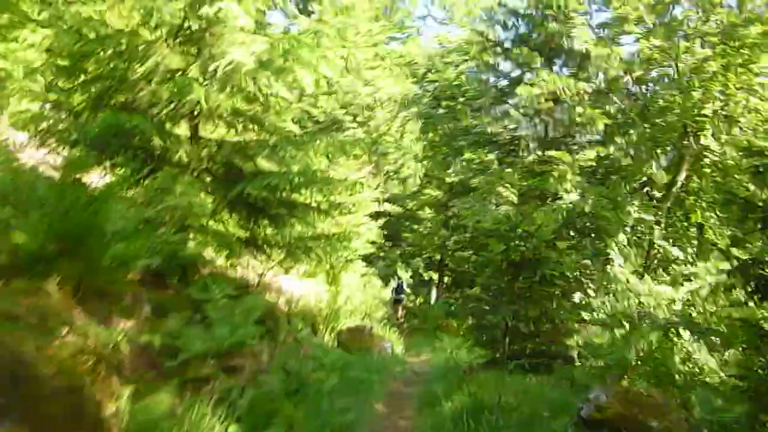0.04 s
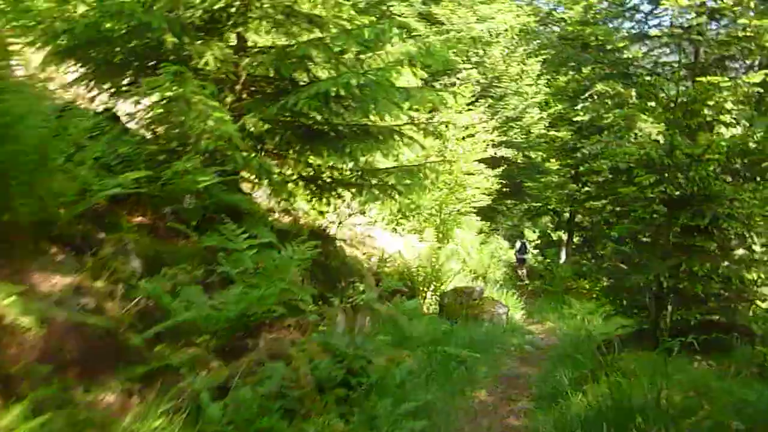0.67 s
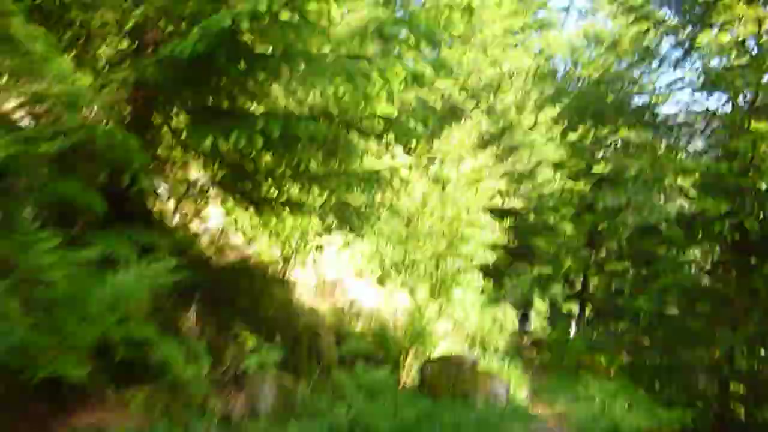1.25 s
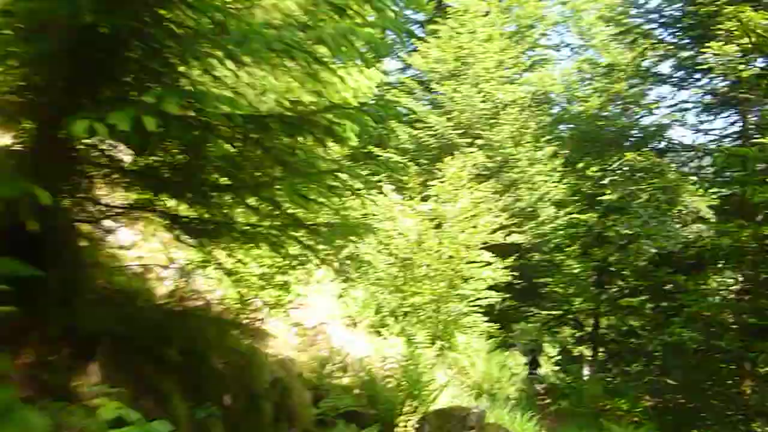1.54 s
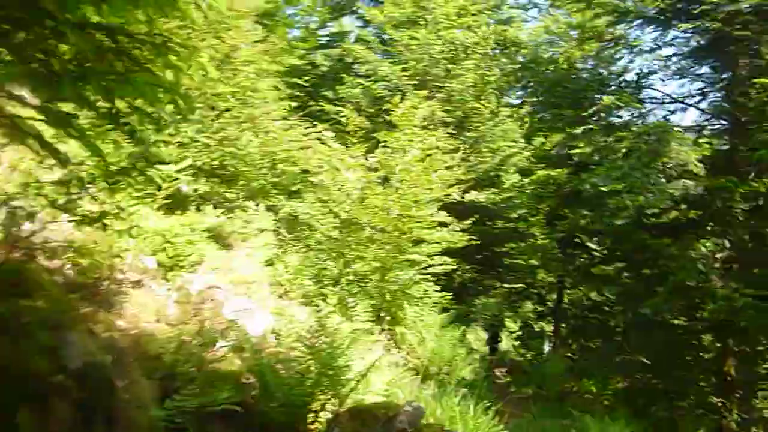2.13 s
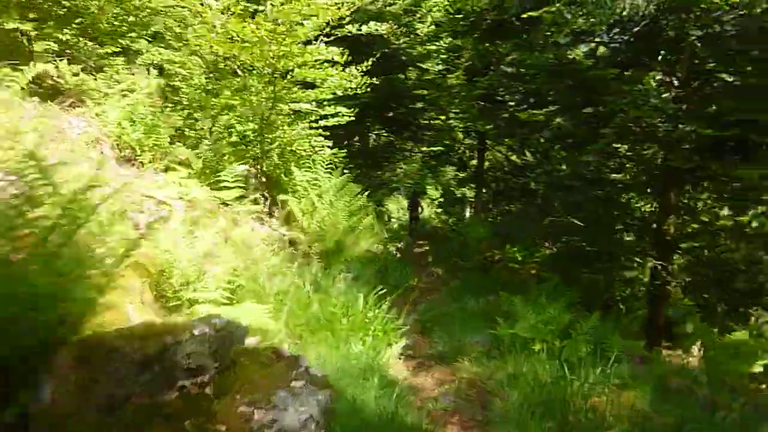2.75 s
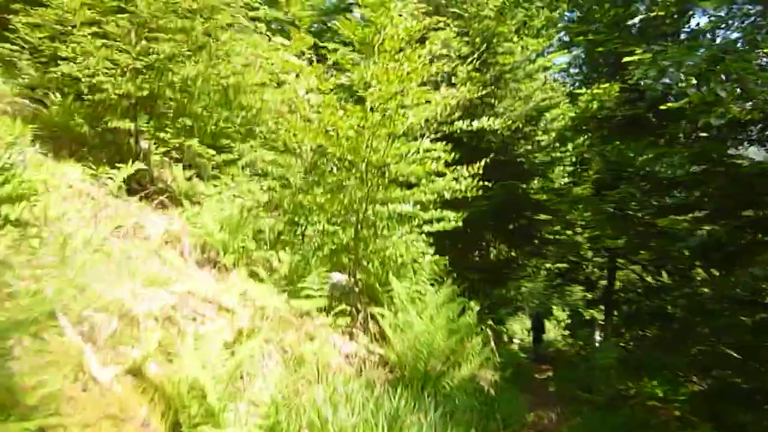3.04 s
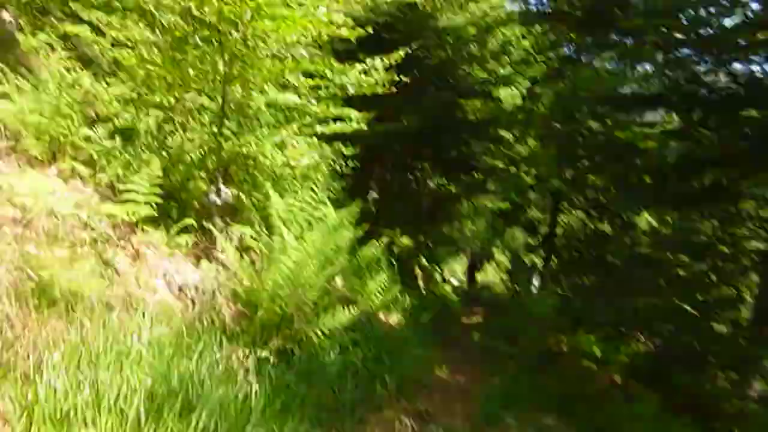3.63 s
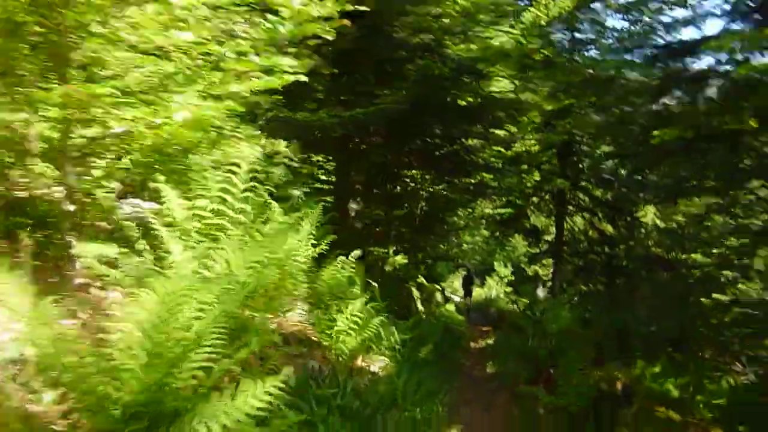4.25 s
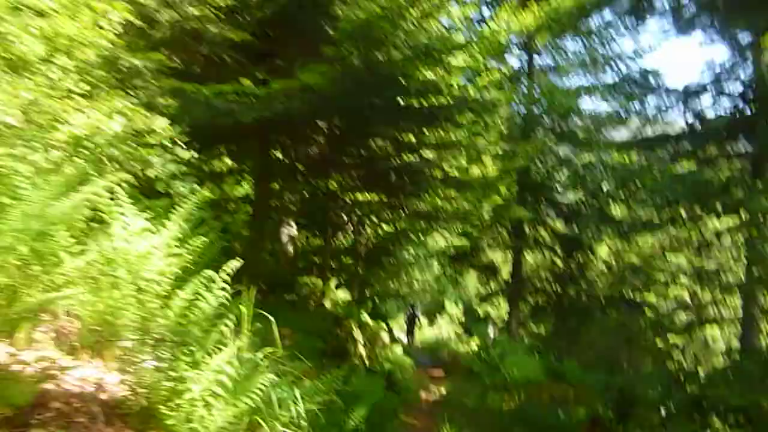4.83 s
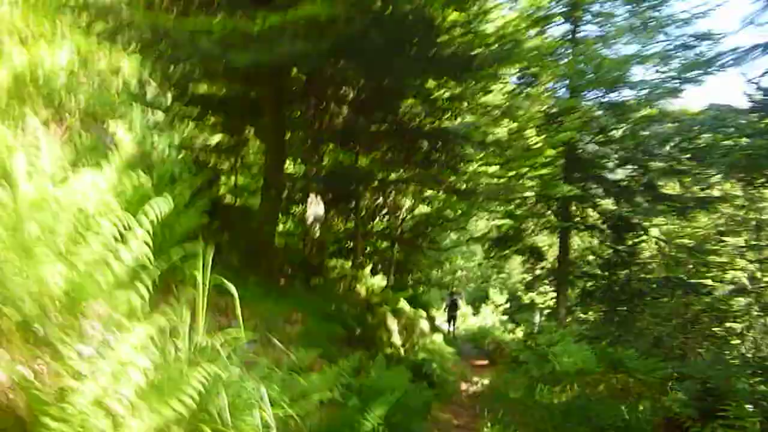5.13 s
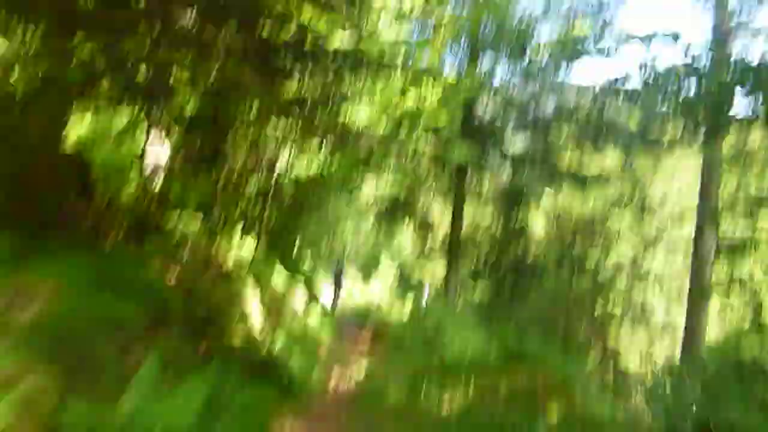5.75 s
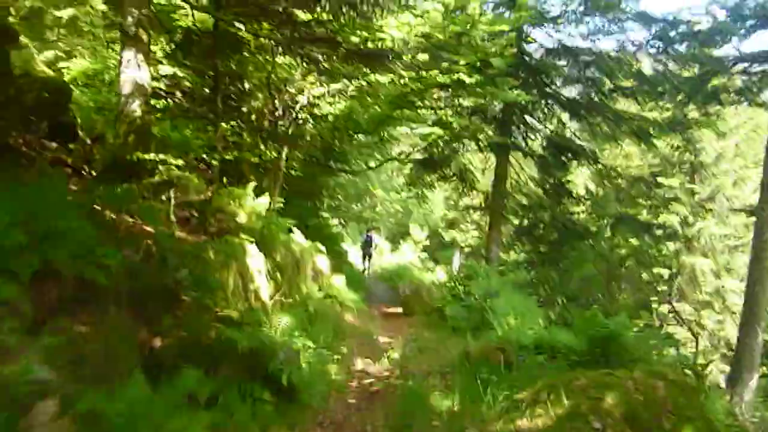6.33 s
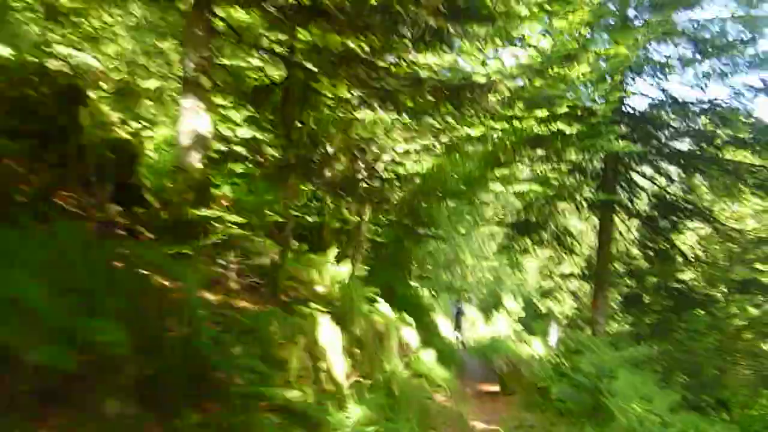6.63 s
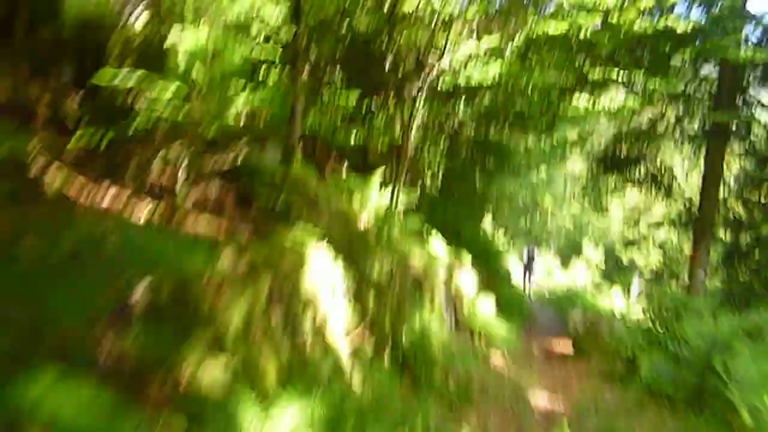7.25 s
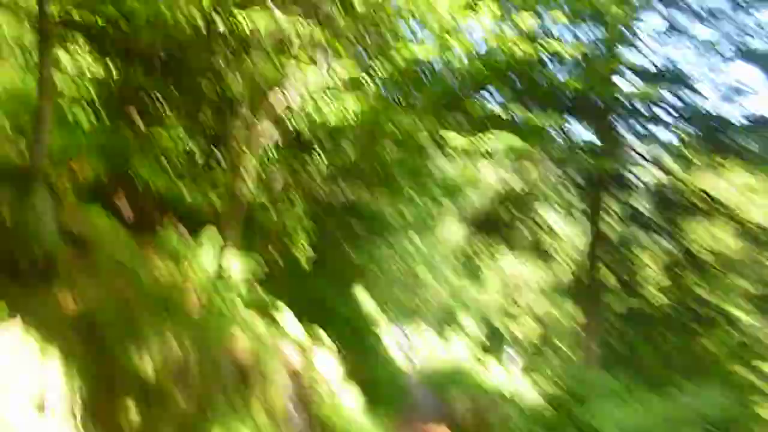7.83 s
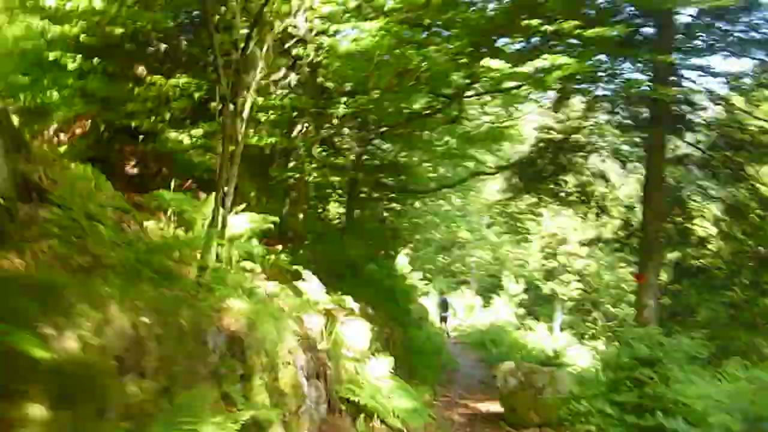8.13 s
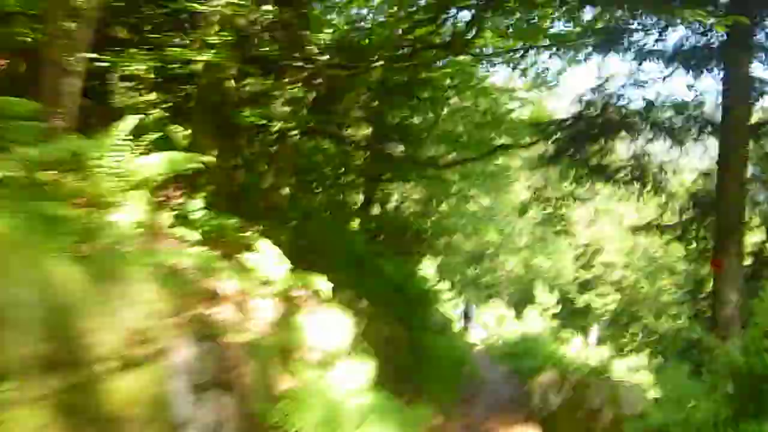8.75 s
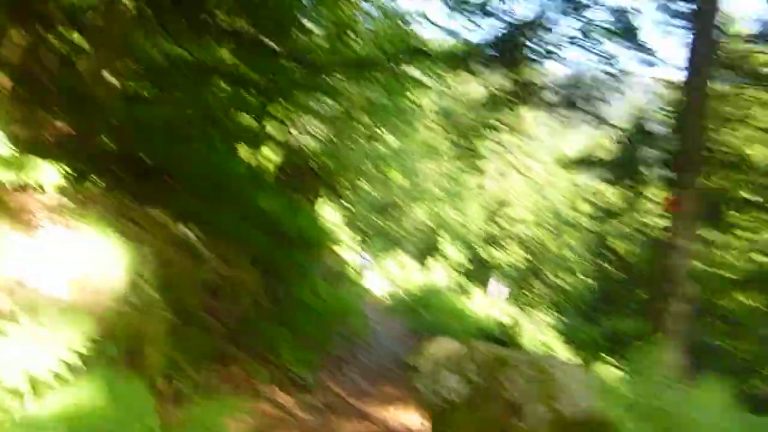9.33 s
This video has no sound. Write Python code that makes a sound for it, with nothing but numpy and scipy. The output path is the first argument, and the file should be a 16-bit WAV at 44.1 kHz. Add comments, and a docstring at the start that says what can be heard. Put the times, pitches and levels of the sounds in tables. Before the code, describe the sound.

Quick, steady running on a forest path is heard through the jolting of a handheld camera. Clusters of short knocks, small rattles and dull thumps repeat from start to finish, about three strides a second. Each arm swing brings a low puff of wind on the microphone, a flutter and a light rustle. Occasional faint ticks and brushes come mostly in the second half. The sound is close, without echo, above a faint hiss.

```python
"""On a dirt forest trail, a runner takes about three strides a second with a small camera in the hand.
Every footfall jolts the camera: loose gear knocks and rattles, exciting damped modes of the housing
and of a small part, and dull thumps come through the grip. With each stride air rumbles over the
microphone, the grip flutters and a soft rustle swells. A few ticks and brushing sounds join in,
all above the recorder's hiss."""
import sys
import numpy as np
from scipy import signal
from scipy.fft import rfft, irfft, next_fast_len
from scipy.io import wavfile
from scipy.ndimage import uniform_filter1d

SR = 44100
rng = np.random.default_rng(int(sys.argv[2]) if len(sys.argv) > 2 else 0)


def persist_wave(psi):
    """Save psi, clipped to +-1, as 16-bit WAV."""
    counts = np.round(np.clip(psi, -1, 1) * 32767).astype(np.int16)
    wavfile.write(sys.argv[1], SR, np.atleast_2d(counts).T)


N = 413646

# strides, at the fastest swing of the arm: time_s, buffet_db, flutter_db, rustle_db
STRIDES = [(0.22, -33.5, -43.5, -48.5), (0.56, -31, -48, -49), (0.89, -40.5, -53, -53.5),
           (1.23, -33.5, -47, -49.5), (1.56, -36.5, -47.5, -51), (1.91, -33, -43.5, -47),
           (2.27, -31, -47, -47.5), (2.621, -34.5, -44, -48.5), (2.99, -30, -44.5, -48),
           (3.32, -32, -41, -49), (3.72, -34.5, -41, -49), (4.0, -31, -43, -51.5),
           (4.438, -32.5, -40.5, -44.5), (4.791, -36.5, -41.5, -48.5), (5.17, -31.5, -49, -54),
           (5.541, -34, -43.5, -50), (5.81, -34.5, -44.5, -50), (6.2, -33, -44, -52),
           (6.55, -35, -42.5, -50), (6.89, -31.0, -42, -50.5), (7.238, -28.5, -43.5, -46),
           (7.56, -35, -47, -48.5), (7.94, -30.5, -39.5, -45), (8.32, -30.0, -44, -49.5),
           (8.7, -32, -39.5, -49), (9.09, -31.5, -45, -51.5), (9.4, -39.5, -47, -50.5)]
# modes of a small loose part: frequency_hz, level_db, t60_s
SMALL_PART_MODES = [(754, 11, 0.0069), (1062, 7, 0.01), (1420, 0, 0.0032), (2167, -5, 0.0073),
                    (2530, -9.5, 0.0064), (2900, -8.5, 0.0069), (3445, -26, 0.0084)]


def gain_of(db):
    """Amplitude ratio: a factor of ten for every 20 dB."""
    return 10 ** (np.asarray(db) / 20)


def unit_rms(x):
    """Normalisation to a mean power of one."""
    return x / np.sqrt(np.mean(x ** 2) + 1e-20)


def spectrum_gain(points, hz):
    """Frequency response: (frequency_hz, level_db) points interpolated on a log-frequency axis."""
    point_hz, db = np.transpose(points)
    return gain_of(np.interp(np.log(hz + 1), np.log(point_hz + 1), db))


def add(mix, start_s, sound):
    """Superposition: a sound sums into the mix from start_s on."""
    part = mix[max(round(start_s * SR), 0):][:len(sound)]
    part += sound[:len(part)]


def noise(spectrum):
    """Spectral shaping: white noise filtered to the given spectrum, at rms 1."""
    size = next_fast_len(N)
    colour = spectrum_gain(spectrum, np.fft.rfftfreq(size, 1 / SR))
    return unit_rms(irfft(rfft(rng.standard_normal(size)) * colour, size)[:N])


def wander(hz):
    """Random modulation: smoothed noise of rms 1, changing about hz times a second."""
    size = int(SR / hz)
    return unit_rms(uniform_filter1d(uniform_filter1d(rng.standard_normal(N), size), size))


def swell(peak_db, rise_db_per_s, fall_db_per_s, rest_db):
    """Exponential growth and decay around each stride, added in power to a resting level."""
    t = np.arange(0, N, 64) / SR
    since_s = t - np.array(STRIDES)[:, :1]
    db = peak_db[:, None] - np.maximum(-since_s * rise_db_per_s, since_s * fall_db_per_s)
    return np.interp(np.arange(N) / SR, t, np.hypot(gain_of(db.max(0)), gain_of(rest_db)))


def stride_noise(buffet_db=3.0, flutter_db=1.3, rustle_db=2.2, lumpy_db=5.0, grain_db=3.5, patch_db=2.5):
    """Amplitude-modulated noise: air buffeting, grip flutter and rustle swell with each stride."""
    # spectra of the three layers: frequency_hz, density_db
    buffet_spectrum = [(8, -3.5), (22, -3), (48, 0.5), (75, -2.5), (110, -6), (170, -15), (300, -39),
                       (600, -84.5)]
    flutter_spectrum = [(50, -16.5), (110, -2.5), (170, 1), (250, -4.5), (350, -9), (440, -13),
                        (560, -20.5), (1000, -44.5), (2000, -70)]
    rustle_spectrum = [(250, -11), (380, -12.5), (440, 0.5), (520, -7), (700, -5), (790, 2), (920, 0),
                       (1180, 1), (1400, -6.5), (1700, -13.5), (2300, -22), (3000, -28), (4000, -37),
                       (8000, -59.5)]
    # their envelopes: rise_db_per_s, fall_db_per_s, rest_db
    buffet_shape = dict(rise_db_per_s=145, fall_db_per_s=148.5, rest_db=-47.5)
    flutter_shape = dict(rise_db_per_s=33.5, fall_db_per_s=47, rest_db=-52.5)
    rustle_shape = dict(rise_db_per_s=23.5, fall_db_per_s=54, rest_db=-58.5)
    _, buffet_peaks, flutter_peaks, rustle_peaks = np.transpose(STRIDES)
    swing = swell(buffet_peaks, **buffet_shape)
    eddies = noise(buffet_spectrum)
    eddies /= np.sqrt(uniform_filter1d(eddies ** 2, size=3500) + 0.057)  # evened: the swing sets the level
    buffet = gain_of(buffet_db) * swing * eddies
    lumps = gain_of(lumpy_db * np.minimum(wander(74), 1.6))
    shake = unit_rms(swing ** 0.23) * lumps  # the grip flutters most in mid-swing
    tremor = unit_rms(noise(flutter_spectrum) * shake)
    flutter = gain_of(flutter_db) * swell(flutter_peaks, **flutter_shape) * tremor
    grains = unit_rms(noise(rustle_spectrum) * gain_of(grain_db * wander(160) + patch_db * wander(22)))
    rustle = gain_of(rustle_db) * swell(rustle_peaks, **rustle_shape) * grains
    return buffet + flutter + rustle


def struck(modes, chatter_s, bounce, grit, push=0, spot_db=2.23, size=3000):
    """Modal response: a force of contact, bounces and scraping is convolved with damped modes."""
    t = np.arange(size) / SR
    hz, mode_db, t60_s = np.transpose(modes)[:, :, None]
    spot, detune, side = rng.standard_normal((3, len(modes), 1))  # each blow lands on a different spot
    swings = np.sin(2 * np.pi * hz * (1 + .008 * detune) * t) * np.sign(side + .4)
    ring = (gain_of(mode_db + spot_db * spot - 60 * t / t60_s) * swings).sum(0)
    ring += push * np.sin(2 * np.pi * 620 * t) * np.exp(-t / 0.00088)  # the blow itself, a dead knock
    scrape_decay = np.exp(-t / chatter_s) + 0.2 * np.exp(-t / 0.018)
    force = grit * rng.standard_normal(size) * scrape_decay
    force[0] += 1  # first contact
    bounce_s = rng.random(5) * 1.5 * chatter_s
    force[np.minimum((bounce_s * SR).astype(int), size - 1)] += bounce * rng.standard_normal(5)
    return signal.fftconvolve(force, ring)[:size]


def rattles(gain_db=-1, chatter_s=.003, stirred_db=-5.0, spread_s=.13):
    """Repeated impact: a small loose part buzzes briefly, and every stride also stirs it faintly."""
    # the clearer rattles: start_s, level_db
    clear = [(0.015, -33), (0.085, -35), (0.104, -37.5), (0.476, -37), (0.646, -39.5), (1.155, -37.5),
             (1.273, -35), (1.324, -36.5), (1.595, -32), (2.318, -37.0), (2.648, -37), (2.757, -42.0),
             (3.001, -32), (3.405, -38), (3.681, -35), (3.754, -32), (3.872, -37), (4.0, -34.5),
             (4.342, -40.5), (4.843, -32), (5.426, -42), (5.581, -36), (5.764, -37), (5.885, -34),
             (5.917, -39), (6.034, -39.0), (6.079, -37.5), (6.172, -42), (6.199, -34.5), (6.306, -36.5),
             (6.368, -39.5), (6.394, -38.5), (6.556, -31.5), (6.852, -35.5), (6.87, -40.0), (7.114, -31.5),
             (7.211, -32), (7.244, -40.0), (7.264, -34.5), (7.529, -39), (7.646, -34.0), (7.766, -40.5),
             (7.93, -32), (7.975, -36), (8.365, -36), (8.395, -34), (8.474, -42), (8.512, -42),
             (8.574, -34), (9.194, -42), (9.363, -39)]
    stirred = [(stride_s + spread_s * rng.uniform(-1, 1), flutter_db + stirred_db)
               for stride_s, _, flutter_db, _ in STRIDES]
    out = np.zeros(N)
    for start_s, db in np.r_[clear, stirred]:
        buzz = struck(SMALL_PART_MODES, chatter_s, bounce=0.57, grit=0.15)
        add(out, start_s, gain_of(db + gain_db) * buzz / np.std(buzz[:SR // 100]))
    return signal.sosfilt(signal.butter(6, 3350, fs=SR, output="sos"), out)


def thumps(gain_db=1.2, rise_cycles=0.4, fall_cycles=0.81, slack=0.64, snap=0.11, size=1200):
    """Heavily damped oscillation: a shove of the grip swings once or twice, quickest at its peak."""
    # shoves through the grip: peak_s, level_db, nominal_pitch_hz
    shoves = [(0.044, -25.5, 154), (0.081, -21.5, 188), (0.136, -18.5, 154), (0.324, -24, 210),
              (0.387, -25.5, 284), (0.552, -16, 199), (0.581, -12, 261), (0.893, -26.5, 195),
              (1.029, -16, 187), (1.548, -23.5, 163), (1.867, -21.5, 230), (1.896, -23.5, 267),
              (1.947, -19, 179), (2.058, -20, 196), (2.225, -23, 192), (2.279, -16, 185),
              (2.748, -16.5, 158), (2.801, -22, 199), (2.936, -24, 165), (3.002, -22.5, 243),
              (3.179, -19, 187), (3.28, -12.5, 211), (3.356, -24.5, 155), (3.585, -22.5, 215),
              (3.721, -21, 149), (3.976, -21, 257), (4.057, -19, 283), (4.138, -16.0, 201),
              (4.244, -22, 311), (4.313, -17, 276), (4.346, -23, 163), (4.424, -16.5, 255),
              (4.439, -18.5, 194), (4.467, -22, 207), (4.653, -15.5, 187), (4.769, -12.0, 200),
              (4.851, -22.5, 169), (5.236, -28.5, 202), (5.495, -22, 187), (5.812, -14, 188),
              (5.944, -26.5, 272), (6.251, -29.5, 340), (6.303, -25.5, 162), (6.667, -21, 210),
              (6.714, -23.5, 179), (7.132, -16.5, 168), (7.254, -14.5, 176), (7.358, -25.5, 211),
              (7.556, -18.5, 190), (7.875, -23, 218), (7.929, -11, 193), (8.268, -22.5, 293),
              (8.351, -19.5, 230), (8.423, -25, 252), (8.646, -20, 177), (8.702, -14.5, 184),
              (8.744, -22, 257), (9.063, -11.0, 185)]
    out, t = np.zeros(N), np.arange(-size, size) / SR
    for (peak_s, db, hz), phase in zip(shoves, rng.random(len(shoves))):
        cycles = t * hz
        envelope = 1 / np.cosh(2 * cycles / np.where(t < 0, rise_cycles, fall_cycles))
        turns = slack * cycles + snap * np.tanh(4 * cycles) + phase
        add(out, peak_s + t[0], gain_of(db + gain_db) * envelope * np.sin(2 * np.pi * turns))
    return out


def weigh_bands(sound, band_db, span_s=.016, size=4096):
    """Minimum-phase filtering: four bands near band_db (energy over span_s), with no pre-ringing."""
    edges_hz = [200, 550, 1400, 3800, 8000]
    plateaus_hz = [(200, 470), (640, 1150), (1650, 3600), (3950, 8000)]
    hz, spectrum = np.fft.rfftfreq(size, 1 / SR), rfft(sound, size)
    energy = np.add.reduceat(abs(spectrum) ** 2, np.searchsorted(hz, edges_hz))[:-1] * 2 / size
    lift_db = band_db - 10 * np.log10(energy / (span_s * SR) + 1e-20)
    log_gain = np.log(spectrum_gain(np.c_[np.ravel(plateaus_hz), np.repeat(lift_db, 2)], hz))
    causal = np.exp(np.conj(signal.hilbert(np.r_[log_gain, log_gain[-2:0:-1]])))
    return irfft(spectrum * causal[:len(spectrum)], size)


def dispersed(x, hz=1500, width_hz=1800):
    """Dispersion: bending waves cross the housing at unequal speeds; an all-pass smears each blow."""
    radius = np.exp(-np.pi * width_hz / SR)
    poles = np.array([1, -2 * radius * np.cos(2 * np.pi * hz / SR), radius ** 2])
    return signal.lfilter(poles[::-1], poles, x)


def knocks(weight_trim_db=-1, click_db=-22, hard_blow_db=-28, graze_db=-22, graze_s=0.0016):
    """Impact excitation: loose gear strikes the housing, and harder blows excite more treble."""
    # blows: start_s, level_db (550-1400 Hz), weight_db (band below), crack_db (band above), chatter_s
    # weight and crack are relative to the level
    blows = [(0.186, -26.5, -8, -13.5, 0.0027), (0.197, -34, -8, -10, 0.0026),
             (0.236, -37, 9.8, -19.8, 0.005), (0.289, -33.5, 0.5, -19, 0.0024),
             (0.459, -34, 6.5, -21, 0.0038), (0.493, -28, -5, -11, 0.0035),
             (0.502, -33.5, 2.5, -14, 0.0056), (0.546, -37.5, 5, -19.3, 0.0056),
             (0.565, -30, 3, -14.5, 0.0055), (0.618, -27, -0.5, -11.5, 0.00099),
             (0.792, -35.5, 4.5, -18, 0.0018), (0.866, -29.5, 0, -12.5, 0.0023),
             (1.083, -35.0, 5, -18, 0.004), (1.124, -27.5, -12, -12, 0.0018),
             (1.188, -29.5, 0.5, -12, 0.002), (1.217, -33.0, -13, -16.5, 0.0026),
             (1.53, -32.5, -9.5, -11, 0.0036), (1.555, -35.5, -4.7, -8, 0.0038),
             (1.757, -32.5, 7.5, -17, 0.0038), (1.819, -26.5, -8, -12.5, 0.0017),
             (1.92, -34.5, 4, -18, 0.0035), (1.993, -32.5, -9.5, -13.5, 0.0026),
             (2.167, -32, 7, -18.5, 0.0041), (2.241, -25.5, -6, -14.5, 0.0026),
             (2.472, -32, 5, -17, 0.0038), (2.521, -25.5, -2, -13, 0.0021),
             (2.569, -36, 4.8, -11.5, 0.0026), (2.626, -34.0, 1.5, -19, 0.0046),
             (2.847, -29.5, 5, -16.5, 0.0045), (2.966, -27.5, -4, -14.5, 0.0043),
             (2.98, -29, -4, -11, 0.0042), (3.181, -26.5, -3, -19, 0.0041),
             (3.255, -25.5, -4.5, -13.3, 0.0028), (3.364, -37.5, 6.8, -24, 0.0044),
             (3.437, -35, -15, -11.5, 0.0021), (3.602, -32.5, 6.5, -15.5, 0.0041),
             (3.698, -31, -10.2, -15, 0.0057), (3.709, -26.5, -12.5, -14, 0.0059),
             (3.729, -35, -5.2, -8.5, 0.0032), (3.934, -35, 7, -15.3, 0.0043),
             (3.978, -27, -1.5, -12, 0.0044), (4.057, -35, 5, -16, 0.0028), (4.263, -34, 0, -10, 0.0045),
             (4.302, -31.5, 8, -14, 0.0043), (4.394, -31.5, 2, -9.5, 0.0018),
             (4.469, -33.5, 4.3, -13.5, 0.004), (4.635, -35, 7.5, -14.8, 0.0033),
             (4.683, -25.5, -3.2, -13.5, 0.0035), (4.768, -31, 7, -16.3, 0.0055),
             (4.778, -35, 6.5, -15, 0.0025), (4.818, -26, -1.5, -9, 0.001),
             (5.024, -35.5, 5, -18.3, 0.0031), (5.077, -28.5, 0, -13, 0.0026),
             (5.138, -35, -11, -12.5, 0.0047), (5.347, -30, -5, -12, 0.002),
             (5.387, -26.5, -1.5, -20.5, 0.0034), (5.493, -38.5, 4, -12, 0.0025),
             (5.753, -36, 8.5, -12, 0.0052), (5.865, -23.5, -6, -14, 0.002),
             (6.094, -34.5, 2, -15.5, 0.0032), (6.186, -36.5, 5.5, -15, 0.0056),
             (6.282, -38, 6.5, -16, 0.0031), (6.454, -38.5, 7, -16.5, 0.0039),
             (6.531, -31, -7.5, -11.8, 0.0056), (6.54, -26.5, -5.2, -10, 0.0015),
             (6.566, -30.5, 2, -12, 0.0027), (6.589, -33.5, -14, -10.5, 0.0034),
             (6.749, -34, 4.5, -19.3, 0.0059), (6.797, -27.5, -2.2, -14.5, 0.0025),
             (6.839, -34.5, 2, -20.5, 0.0056), (6.902, -34.5, 8, -18.5, 0.004),
             (7.148, -32.5, 7, -17.5, 0.0039), (7.183, -25, -4.5, -9, 0.002),
             (7.221, -33.0, -15.2, -12.3, 0.0042), (7.435, -25.5, -3, -18.5, 0.0023),
             (7.472, -25.5, -6.5, -13.8, 0.0018), (7.568, -36.5, 5, -16, 0.0032),
             (7.604, -33, -15.7, -12.5, 0.0029), (7.798, -33, 6, -17, 0.0033),
             (7.881, -34, -3, -21, 0.0029), (7.902, -30, -1, -9, 0.0037), (7.923, -30, -1, -14, 0.0064),
             (8.131, -31, 6.5, -18, 0.004), (8.262, -23, -8.5, -13.5, 0.0018), (8.299, -32, -4, -14, 0.003),
             (8.326, -32, -7, -11.5, 0.0013), (8.341, -36.5, 6, -16, 0.0023),
             (8.378, -28.5, -4.5, -12.5, 0.0014), (8.558, -37.5, 7.5, -13, 0.00336),
             (8.692, -28, -5.5, -12.5, 0.0024), (8.736, -32.5, -5.5, -13, 0.0028),
             (8.89, -37.5, 6.5, -16.5, 0.0034), (9.011, -25.5, -6.2, -10.5, 0.0015),
             (9.09, -34, 1, -16.5, 0.0059), (9.103, -34, 5.5, -17, 0.0026),
             (9.139, -26.5, -1, -9.5, 0.0015), (9.232, -34, -2, -11, 0.0017),
             (9.318, -37, 4.5, -14.8, 0.0038)]
    # modes of the housing: frequency_hz, level_db, t60_s
    housing_modes = [(335, -14.5, 0.016), (442, -8, 0.072), (661.3, -9.5, 0.058), (790.6, -5, 0.037),
                     (942, -1.5, 0.02), (1084, -3.5, 0.019), (1415, -7, 0.018), (1697, -5, 0.011),
                     (1978, -5, 0.01), (2570, -15.5, .011), (2952, -9.5, 0.0099), (3250, -14.5, 0.0081),
                     (3650, -12.5, 0.012), (4400, -3, 0.0055), (4840, -14, 0.01), (5400, -15, 0.01),
                     (6050, -37.5, .008)]
    out = np.zeros(N)
    for start_s, db, weight_db, crack_db, chatter_s in blows:
        hardness_db = db - hard_blow_db
        modes = np.array(housing_modes, float)
        modes[modes[:, 0] > 3150, 1] += 2 * min(hardness_db, 0)  # soft contact is too slow for top modes
        bands_db = db + np.array([weight_db + weight_trim_db, 0, crack_db,
                                  crack_db + click_db + hardness_db])
        hit = struck(modes, chatter_s, bounce=0.37, grit=0.048, push=1.92)
        add(out, start_s, weigh_bands(hit, bands_db))
        graze = struck(SMALL_PART_MODES, chatter_s, bounce=1.0, grit=.12)
        lead_s = graze_s * rng.random()  # the gear grazes just before it lands
        add(out, start_s - lead_s, gain_of(db + graze_db) * graze / np.std(graze[:SR // 100]))
    return dispersed(out)


def ticks(gain_db=2, decay_s=0.0034, band_hz=(1750, 5200), size=900):
    """Broadband transients: bright noise bursts with a fast exponential decay, heard as tiny snaps."""
    # snaps: start_s, level_db
    snaps = [(2.127, -49), (5.7698, -46), (5.822, -37.5), (6.1588, -42.5), (6.425, -42), (6.4901, -51),
             (8.6537, -38.5), (8.771, -38.5), (9.075, -41)]
    out, t = np.zeros(N), np.arange(size) / SR
    bright = signal.butter(2, band_hz, "band", fs=SR, output="sos")
    for start_s, db in snaps:
        burst = signal.sosfilt(bright, rng.standard_normal(size) * np.exp(-t / decay_s))
        add(out, start_s, gain_of(db + gain_db) * burst / abs(burst).max())
    return out


def brushes(grain_db=4):
    """Friction noise: something brushes past the camera in a short, grainy swish."""
    # touches: middle_s, half_length_s, level_db
    touches = [(2.131, .018, -37.5), (5.806, 0.028, -41), (7.074, .01, -35.5)]
    # spectrum of the swish: frequency_hz, density_db
    swish_spectrum = [(200, -15), (450, 7.5), (1100, -2.5), (1700, -10.5), (3300, -17.5), (4500, -33),
                      (8000, -40)]
    t = np.arange(N) / SR
    envelope = sum(gain_of(db) * np.exp(-((t - middle_s) / half_s) ** 2)
                   for middle_s, half_s, db in touches)
    return envelope * unit_rms(noise(swish_spectrum) * gain_of(grain_db * wander(330)))


def scene():
    """Direct sound: all sources sum at one close microphone, with no echo."""
    return (knocks() + rattles() + thumps() + ticks() + brushes() + stride_noise())[None]


def record(dry, hiss_db=-66, cutoff_hz=8700):
    """Self-noise and limited bandwidth: the recorder adds hiss and cuts the high treble."""
    # spectrum of the hiss: frequency_hz, density_db
    hiss_spectrum = [(100, -5), (2000, -4.5), (3500, -2), (4500, -4.5), (7000, -7), (9000, -12.5)]
    # the recorder's treble roll-off: frequency_hz, gain_db
    roll_off = [(6000, 1), (7000, 0), (7800, -2), (8300, -7), (8800, -26.5)]
    hissy = dry + gain_of(hiss_db) * noise(hiss_spectrum)
    size = next_fast_len(N + SR)
    response = spectrum_gain(roll_off, np.fft.rfftfreq(size, 1 / SR))
    dulled = irfft(rfft(hissy, size) * response, size)[:, :N]
    low_pass = signal.firwin(255, cutoff_hz, window=("kaiser", 9), fs=SR)
    return signal.oaconvolve(dulled, low_pass[None], "same")


dry = scene()
out = record(dry)
persist_wave(out)
```